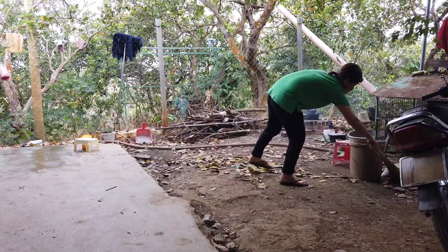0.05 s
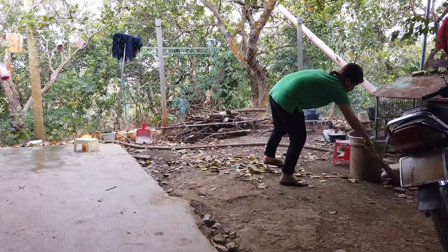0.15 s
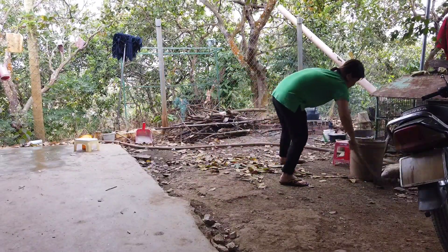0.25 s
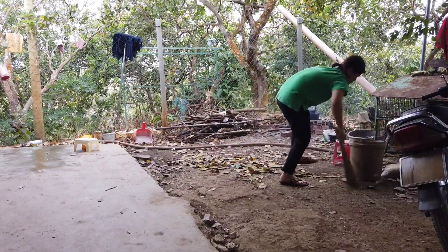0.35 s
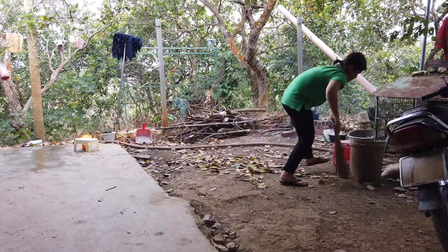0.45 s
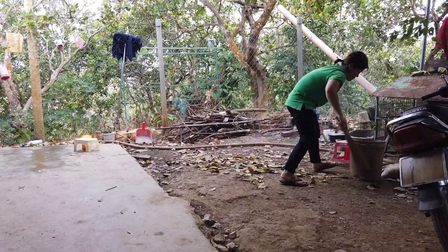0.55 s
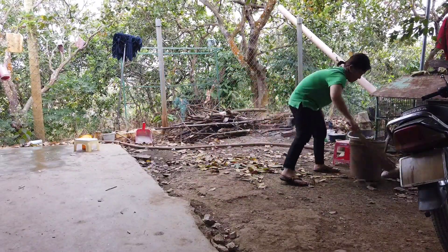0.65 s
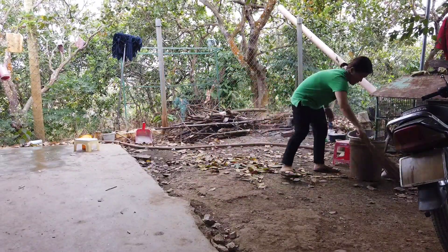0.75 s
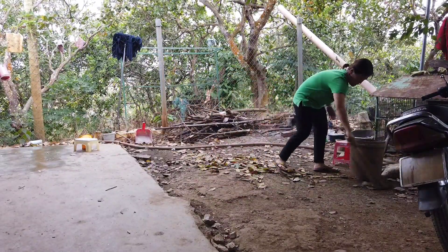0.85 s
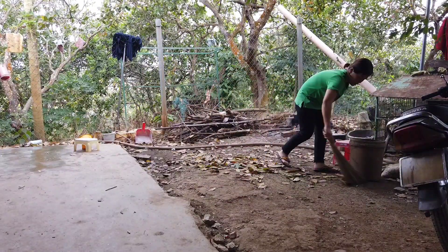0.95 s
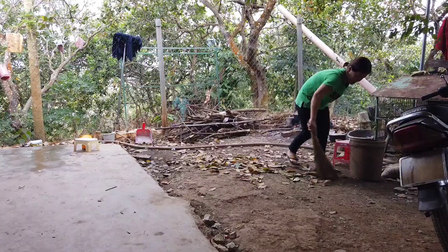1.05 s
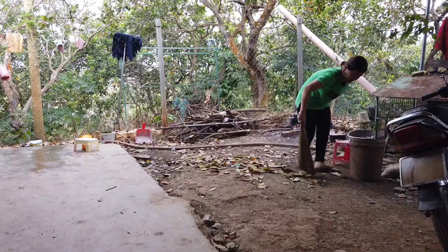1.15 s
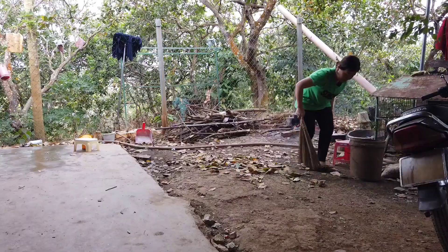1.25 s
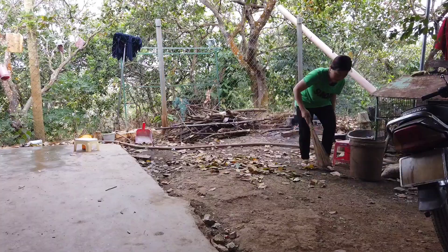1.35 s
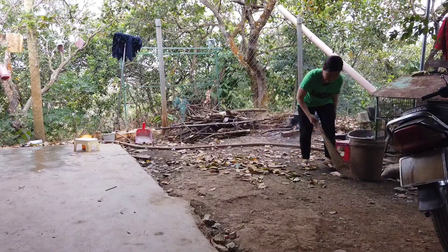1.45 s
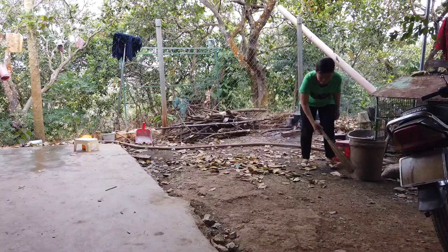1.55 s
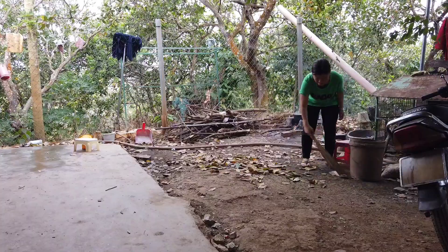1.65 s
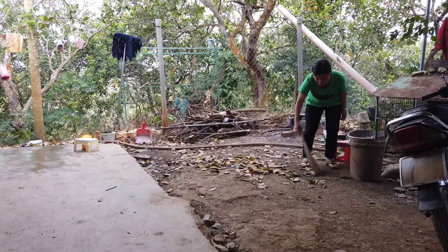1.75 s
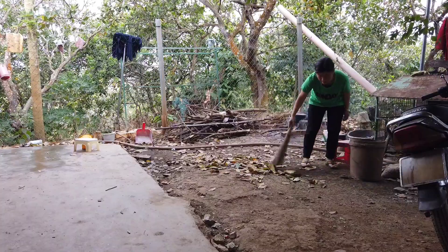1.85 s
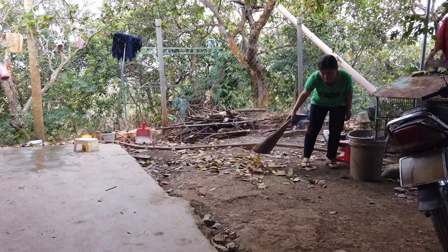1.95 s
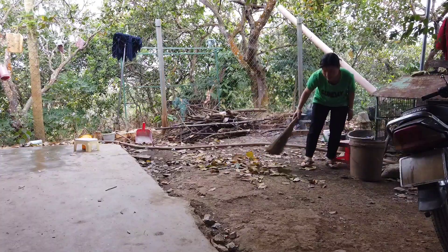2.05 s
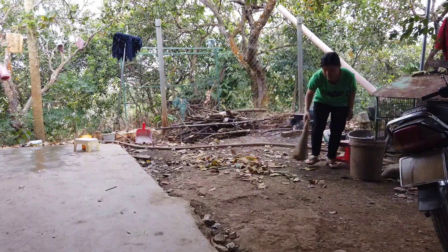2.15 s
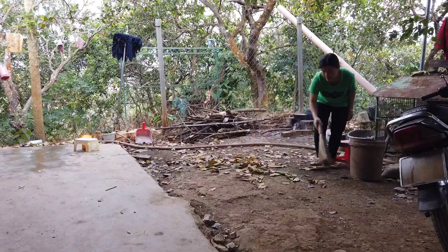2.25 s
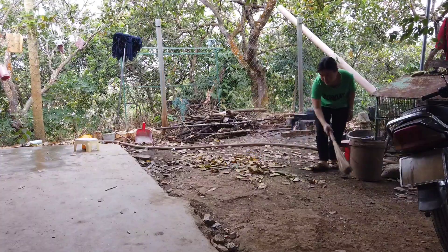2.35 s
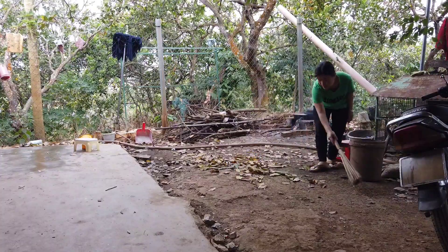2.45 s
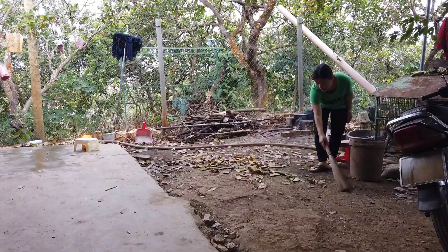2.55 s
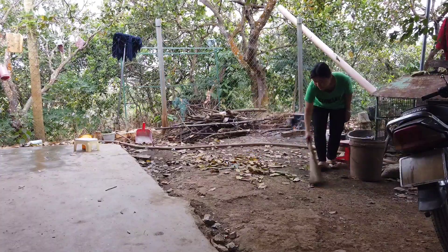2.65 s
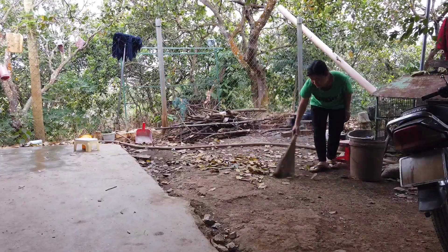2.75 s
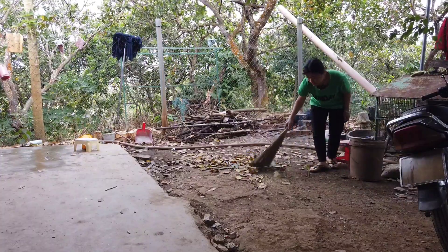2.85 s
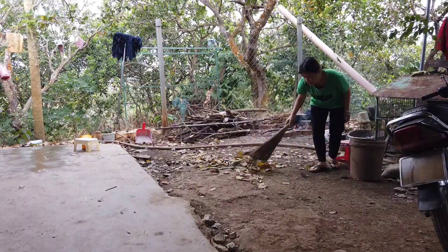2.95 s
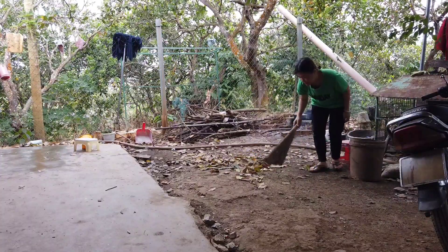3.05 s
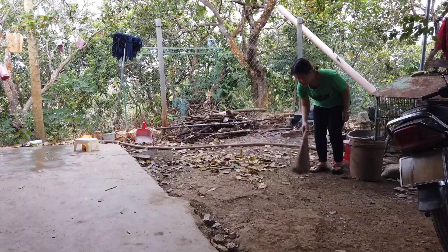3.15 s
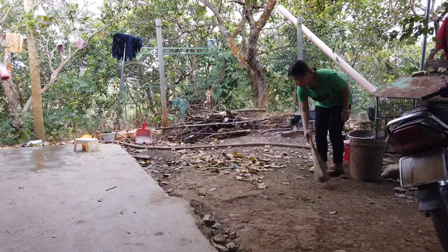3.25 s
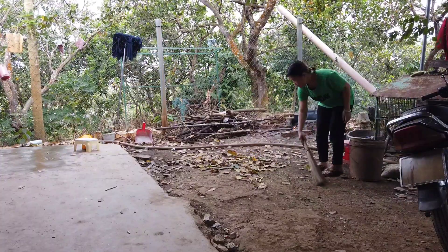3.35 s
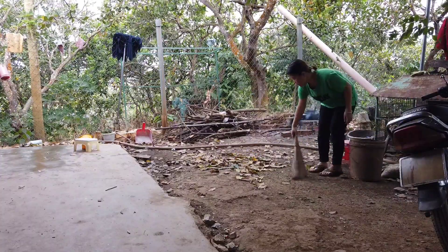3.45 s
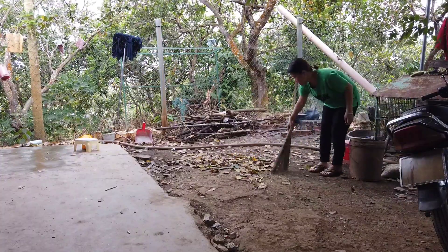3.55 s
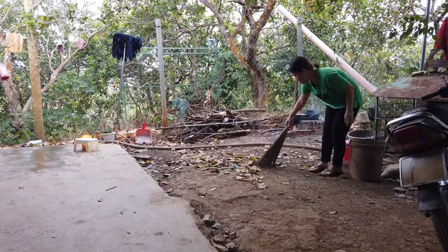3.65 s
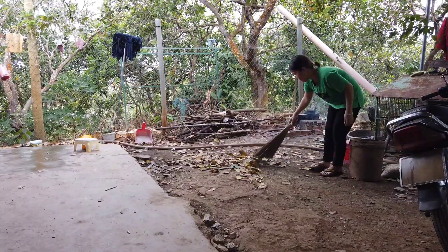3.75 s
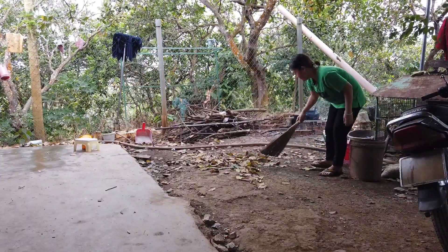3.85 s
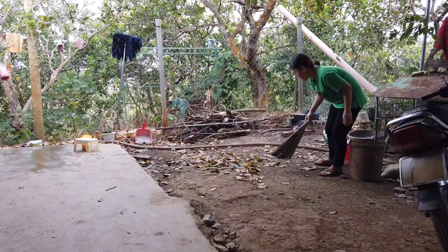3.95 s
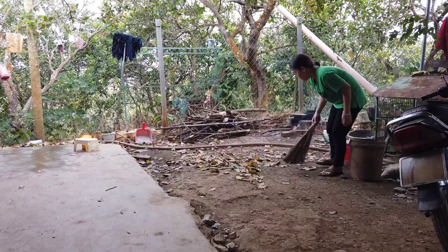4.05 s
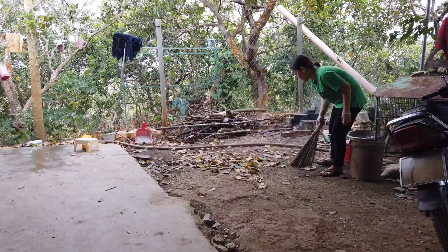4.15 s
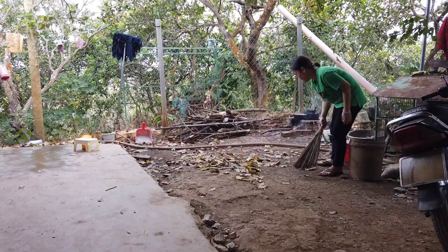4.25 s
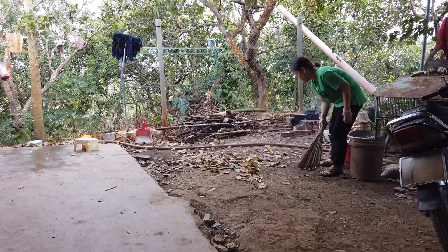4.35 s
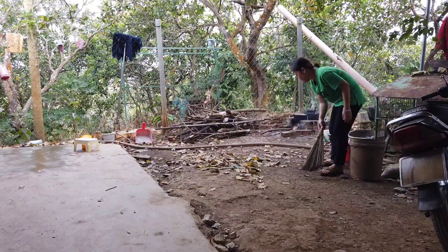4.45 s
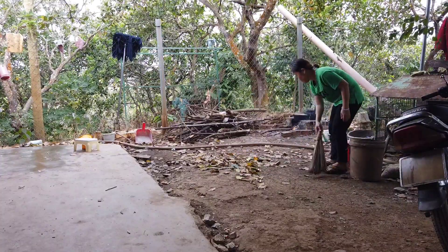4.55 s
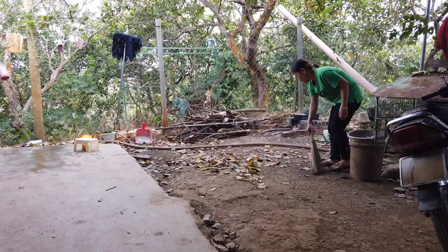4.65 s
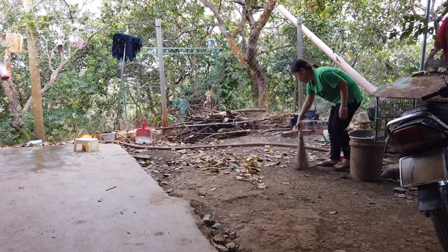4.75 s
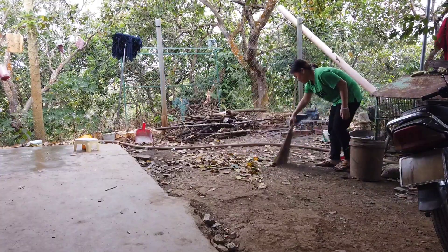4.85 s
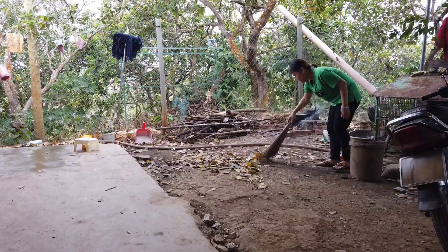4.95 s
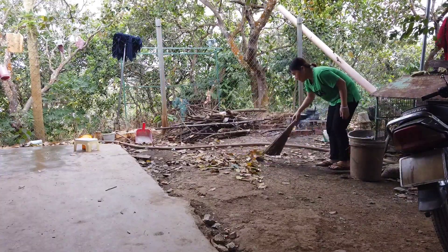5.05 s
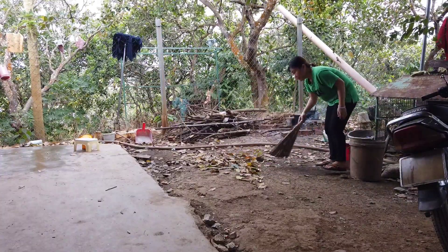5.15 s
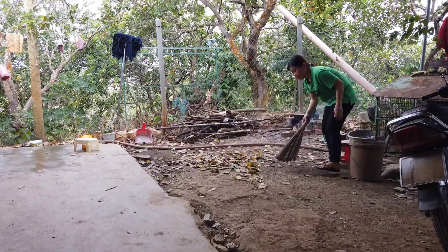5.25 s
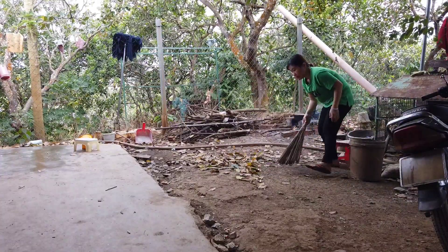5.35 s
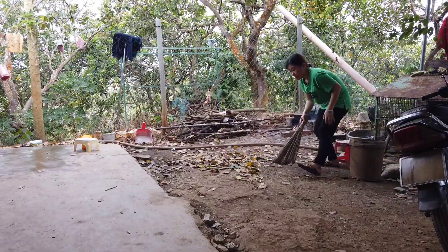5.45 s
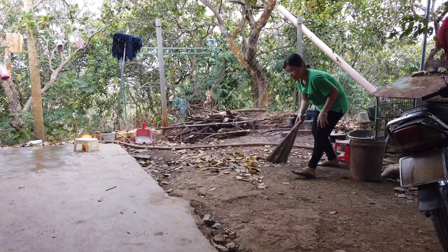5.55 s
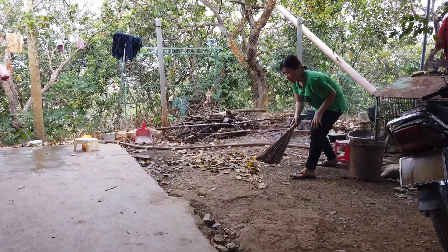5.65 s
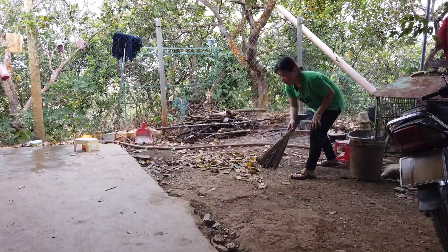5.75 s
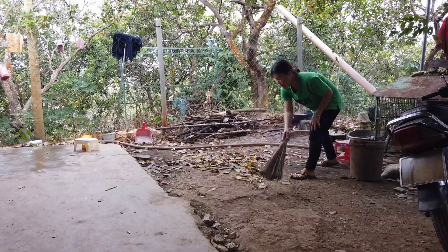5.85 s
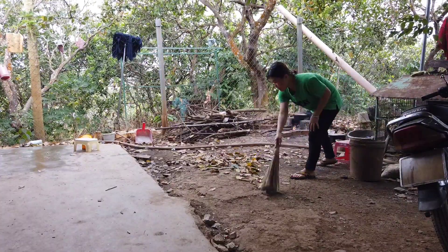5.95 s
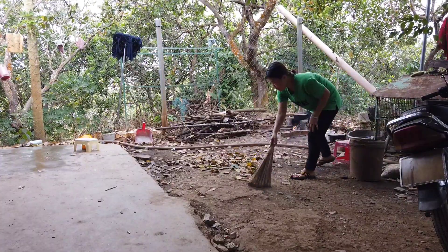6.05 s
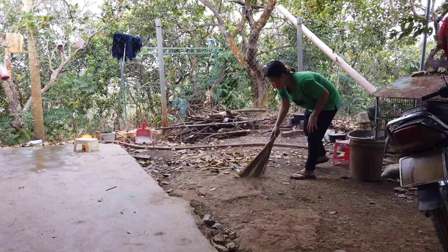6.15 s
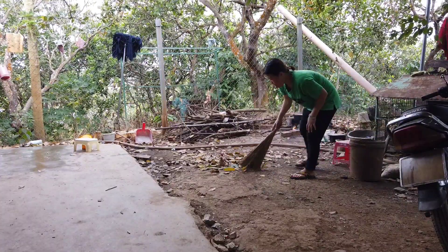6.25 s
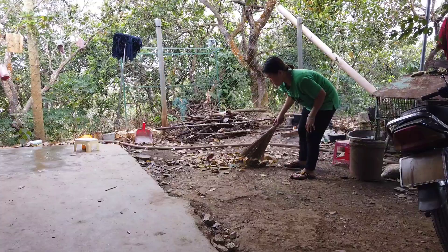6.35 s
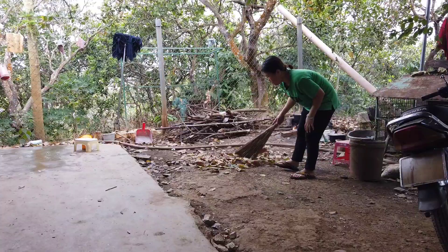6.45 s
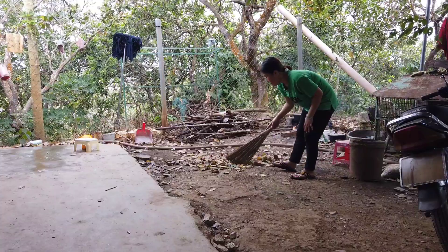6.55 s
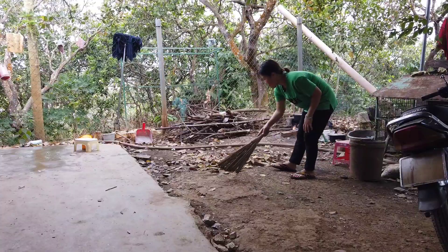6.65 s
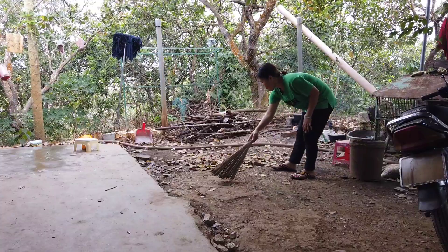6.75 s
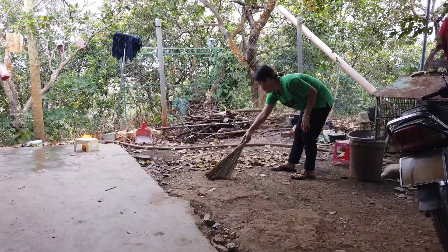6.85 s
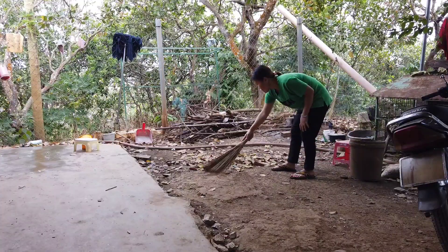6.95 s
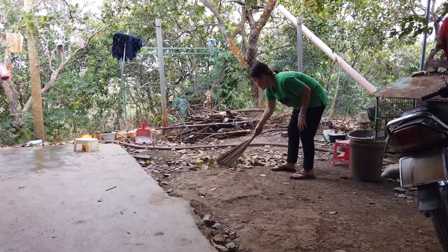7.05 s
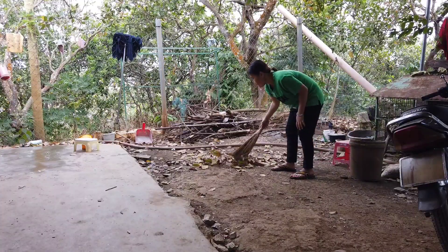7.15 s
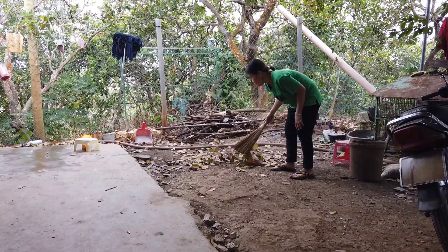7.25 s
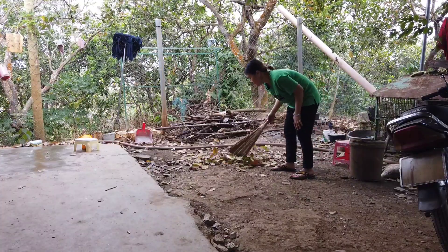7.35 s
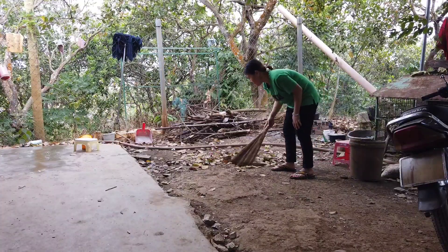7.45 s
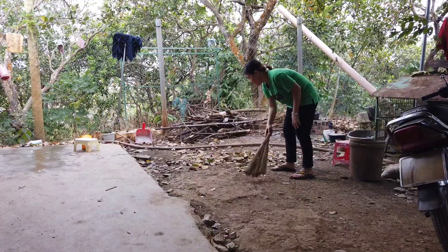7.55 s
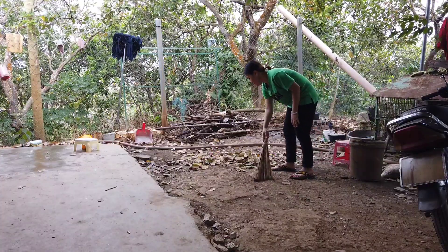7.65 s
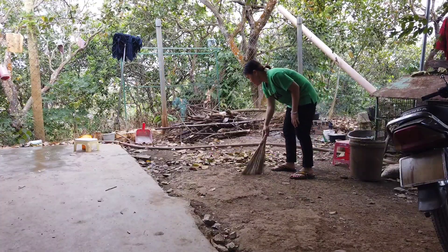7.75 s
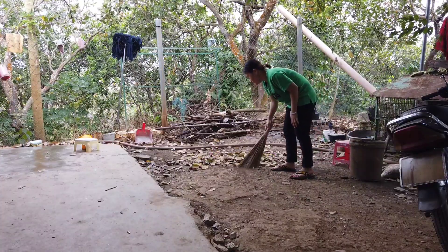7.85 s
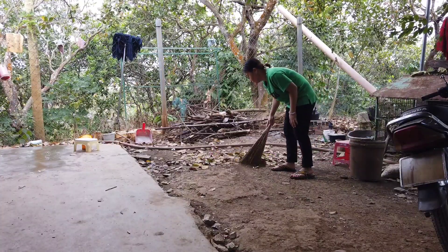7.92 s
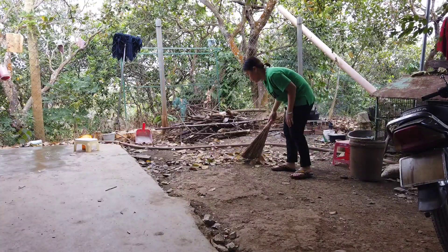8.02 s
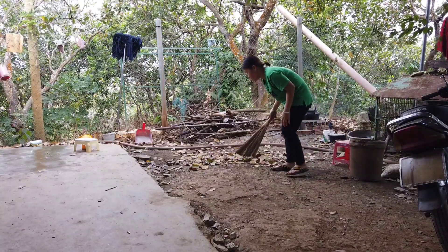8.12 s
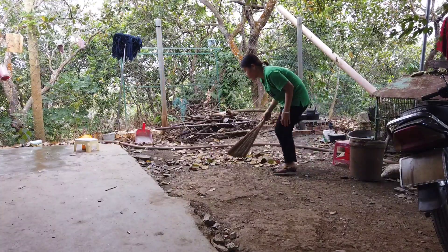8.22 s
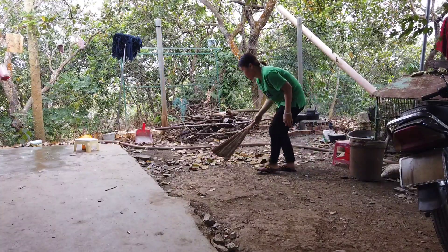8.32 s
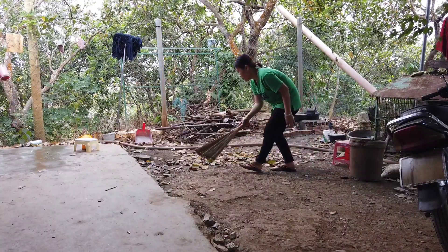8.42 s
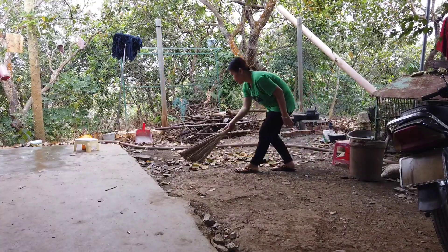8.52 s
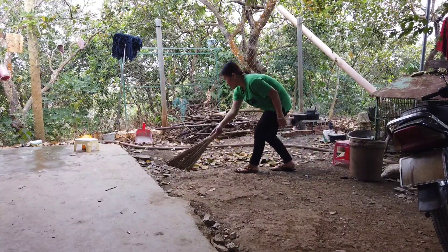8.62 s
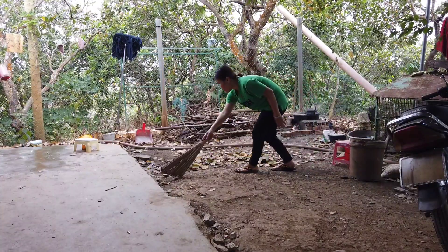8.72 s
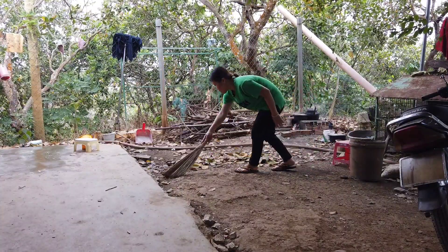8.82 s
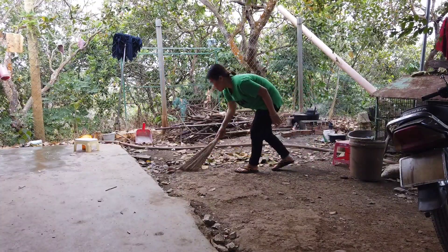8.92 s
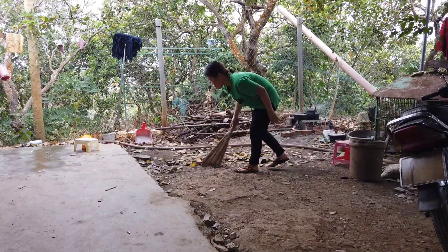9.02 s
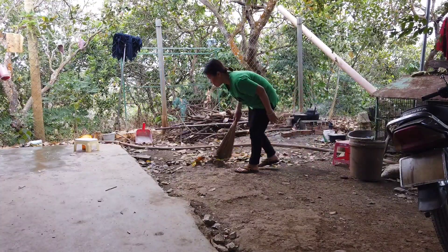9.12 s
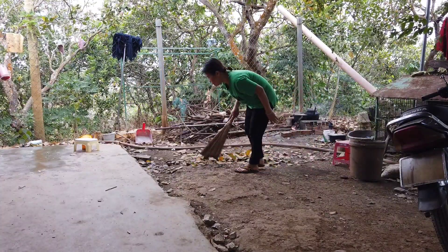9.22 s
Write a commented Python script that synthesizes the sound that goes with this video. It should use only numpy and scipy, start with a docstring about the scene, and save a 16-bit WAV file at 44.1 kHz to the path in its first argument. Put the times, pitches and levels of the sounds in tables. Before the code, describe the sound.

A stiff grass broom sweeps dry leaves and grit over bare dirt, heard in stereo from a few steps away in a quiet yard. Strokes start near 0.1, 0.9, 1.6, 2.6, 3.4, 4.7, 6.1, 6.9, 7.7 and 8.8 seconds. Each lasts about 0.7 seconds: bright bristle hiss, a fast swell with brittle leaf rattle and low gritty drag, then a thin trailing swish. Near-quiet gaps hold foot shuffles and toppling leaves. Twigs snap around 0.6, 0.8, 2.0 to 2.3, 3.1, 3.6 and 6.2, most sharply just after 9. Faint narrow scrapes appear, especially at 5.8 to 7.5. Dull soft thuds land near 1.6, 5.0, 8.4 and 8.9. Uneven light wind rumble and a wavering distant low hum stay underneath. A very brief high pip swells and stops abruptly close to the end.

```python
"""A stiff grass broom sweeps dry leaves and grit over bare dirt, a few steps from two microphone ports.
Dense ticks and noise make the bristles hiss; leaves rattle as knocked resonances; soil drags in low scrapes.
Twig snaps, narrow scrapes, dull thuds and one brief swelling pip punctuate the strokes.
Lumpy low noise is light wind at the ports; shaped noise is a quiet yard; a wavering low hum swells far away."""
import sys
import numpy as np
from scipy import signal
from scipy.fft import rfft, irfft
from scipy.io import wavfile
from scipy.ndimage import uniform_filter1d

SR = 44100
rng = np.random.default_rng(int(sys.argv[2]) if len(sys.argv) > 2 else 0)


def unload_audio(sound):
    """Save the sound as a 16-bit wav file, at the path given as the first command line argument."""
    columns = np.transpose(np.atleast_2d(sound))
    # keep every value between -1 and 1, then stretch to whole-number steps
    steps = np.round(np.clip(columns, -1, 1) * 32767)
    wavfile.write(sys.argv[1], SR, steps.astype(np.int16))


N = 409248

# Broom strokes: the tips land, skim, are pushed hard, ease off, trail along and lift.
# (touch [s], skim [s], rise [s], hold [s], ease [s], lift after touch [s], dying [dB/s], skim level [dB],
#  level at end of push [dB], trail level [dB], last level [dB], skimming sizzle [dB], pushed sizzle [dB])
STROKES = [(0.143, .17, 0.074, 0.082, 0.11, 0.64, 90, -54.5, -39, -60.5, -73, 1.5, 0),
           (0.943, .036, .15, 0.032, 0.19, .63, 150, -43.5, -39, -56, -58.5, -1.5, 0.5),
           (1.636, .185, 0.14, .02, .08, 0.71, 77, -48, -38.5, -45.5, -53.5, 1.2, -2),
           (2.612, 0.055, .15, 0.11, 0.088, 0.72, 114, -52, -34, -44, -54, 3, -3),
           (3.443, .12, .07, 0.17, 0.11, 0.65, 120, -47, -39.5, -51, -60, 2.5, -1.5),
           (4.718, .13, .10, 0.073, 0.11, 0.73, 69, -49, -40.5, -50.5, -66.5, 3.5, -0.3),
           (6.08, .036, 0.17, .08, 0.2, 0.66, 105, -45, -34, -49, -50.5, 5, -4.5),
           (6.865, .09, .19, .08, .16, .76, 120, -58, -36, -50, -59.5, 4, -1.5),
           (7.748, 0.056, 0.17, .03, 0.22, 0.68, 135, -50.5, -39.5, -52.5, -58, 4.5, -2),
           (8.826, 0.062, .17, 0.064, .15, .60, 100, -53.5, -36.5, -53.5, -60, .2, 1)]
# The heap each stroke moves, in the same order; leaf and soil levels are reached at the end of the hold.
# (caught after touch [s], rise [s], hold [s], ease [s], leaf level [dB], leaf trail level [dB],
#  leaf last level [dB], soil lag [s], soil level [dB], soil trail level [dB])
HEAPS = [(0.12, 0.071, 0.096, .11, -40, -53.5, -67.5, -0.048, -52, -67),
         (0.0075, 0.13, 0.052, 0.053, -45, -50, -61.5, -0.054, -59.5, -65),
         (0.16, 0.14, 0.1, 0.068, -45, -49, -53.5, .01, -53.5, -58.5),
         (.13, 0.036, 0.16, 0.083, -38, -48.5, -54.5, .01, -47.5, -59),
         (0.15, 0.055, .20, .07, -45.5, -50, -52, .02, -57.5, -61),
         (.12, .14, .02, .12, -40, -52, -65, .07, -48.5, -58.5),
         (0.072, 0.051, 0.2, .10, -37, -48, -51.5, -0.015, -46, -56.5),
         (.17, .12, .07, .14, -37, -49.5, -59, .03, -45, -58.5),
         (.16, 0.065, .10, 0.12, -43, -50, -61, -.01, -51.5, -59),
         (.21, .06, 0.081, .07, -40, -54, -62, -.005, -47.5, -64.5)]
# Feet shift and leaves topple: (middle [s], length [s], leaf level [dB], soil level [dB], bristle level [dB])
SHUFFLES = [(0.01, 0.29, -65, -85, -68.5), (0.235, 0.18, -53.5, -61, -80), (0.352, 0.061, -37.5, -55, -80),
            (0.65, .06, -75, -72, -61), (0.722, .14, -73, -62, -80), (0.838, .05, -61, -63, -90),
            (0.898, 0.076, -63.5, -69, -90), (1.399, 0.068, -55, -63, -80), (1.715, .15, -53.5, -57, -80),
            (1.765, 0.065, -61, -65, -44.5), (2.303, 0.12, -50, -68, -70), (3.23, 0.18, -67, -64, -70),
            (3.102, .06, -60, -65, -54), (3.69, .05, -46, -60, -60), (3.82, .07, -48, -52, -60),
            (5.753, 0.33, -74.5, -69.5, -90), (6.1, 0.18, -75, -64.5, -90), (6.686, 0.14, -51, -70, -70),
            (8.32, 0.17, -62, -61, -80), (8.491, 0.17, -75, -57.5, -80), (8.71, .1, -78, -65, -90),
            (8.91, 0.087, -69, -60, -70), (9.02, .14, -53, -63, -70), (9.025, .045, -43, -52, -70)]
# Bristle tips touch down: (time [s], approximate peak level [dB], t60 [s])
TOUCHES = [(0.1424, -62, 0.15), (0.6973, -57, 0.13), (0.9623, -44, 0.15), (1.644, -42, 0.15),
           (3.0994, -36.5, 0.16), (4.5047, -60, 0.15), (4.6573, -51, 0.16), (6.101, -42, 0.15),
           (8.8555, -39, 0.15)]
# Narrow hollow-toned scrapes: (time [s], length [s], level before the fade [dB], pitch [Hz], width [Hz])
SCRAPES = [(0.138, .12, -62.5, 2300, 350), (0.166, .05, -62, 3400, 300), (0.168, 0.16, -62, 765, 120),
           (0.638, .04, -64, 1900, 120), (0.841, 0.027, -61, 1400, 150), (0.958, .04, -56, 3130, 400),
           (5.76, 0.22, -66, 707, 110), (6.031, 0.069, -68, 745, 110), (6.717, 0.075, -63, 810, 100),
           (6.803, 0.076, -60.5, 1770, 150), (6.875, 0.13, -63.5, 1760, 170), (6.8, 0.13, -69, 2450, 150),
           (7.021, .07, -70, 820, 100), (7.491, 0.18, -62, 1770, 170)]
# Single twig and leaf snaps: (time [s], peak level [dB], pitch [Hz], t60 [s], ring relative to tick [dB])
SNAPS = [(0.143, -49.5, 2170, 0.05, -6), (0.569, -42, 2410, 0.05, -10), (0.606, -41, 2670, 0.05, -9.5),
         (0.696, -53, 1870, 0.05, -8), (0.711, -49, 1960, 0.05, -7), (0.824, -37, 1600, 0.046, -12),
         (1.447, -46, 1980, 0.05, -8), (1.53, -51, 1790, 0.05, -8), (2.008, -31, 2580, 0.05, -6.5),
         (2.132, -36, 2320, 0.05, -6.5), (2.267, -37.5, 1870, 0.05, -6), (3.099, -34, 2520, 0.039, -10),
         (3.609, -32, 2600, 0.05, -5), (5.705, -54, 2570, 0.055, -8), (6.205, -32, 1910, 0.05, -9),
         (8.373, -37, 5200, 0.03, -19), (9.024, -24, 2750, 0.05, -10.5), (9.087, -30, 2220, 0.042, -8.5)]
# A foot or the broom head lands:
# (time [s], t60 [s], broad scuff level [dB], hollow mode level [dB], low mode level [dB])
THUDS = [(1.644, 0.4, -56, -61, -47.5), (4.968, 0.33, -58, -43.5, -65), (5.01, 1, -68, -73, -53.5),
         (8.427, 0.84, -58, -63, -52), (8.904, 0.69, -66, -58.5, -54.5)]
# Bristle spectrum: (frequency [Hz], relative level [dB])
TIPS_SPECTRUM = [(400, -22), (1500, -25), (2500, -4.5), (4500, -5), (6500, -1), (8900, -2.5), (10500, 1.5),
                 (13000, -4), (15500, -7)]
# How far the sizzle acts on the hiss: (frequency [Hz], share [0-1])
SIZZLE_SHARE = [(6000, 0), (10500, 0.88)]
# Leaf spectrum: (frequency [Hz], relative level [dB])
LEAF_SPECTRUM = [(400, -25), (900, -6.5), (1300, -3.5), (1700, 3.5), (2600, 3), (3300, 0), (4200, -5.5),
                 (6500, -9), (10000, -10), (15500, -16)]
# Soil spectrum: (frequency [Hz], relative level [dB])
SOIL_SPECTRUM = [(90, -8), (200, -9.5), (330, 3.5), (430, -2), (600, 2), (760, 6.5), (920, 3), (1200, -0.5),
                 (1600, 3.5), (4000, -49)]
# Low rumble at the ports, its uneven level through random lumps: (time [s], mid level [dB])
RUMBLE_LEVEL = [(0.0, -65), (0.59, -68), (0.67, -53), (0.82, -66), (0.95, -47.5), (1.32, -58), (1.76, -51),
                (1.81, -64), (2.19, -63), (2.3, -49), (2.35, -64.5), (3.1, -64), (3.18, -72), (3.2, -56),
                (3.9, -69.5), (4.65, -56), (4.88, -66), (4.91, -51), (5.06, -68), (5.19, -44), (5.25, -62),
                (5.48, -58.5), (8.32, -64), (8.4, -50), (8.66, -49.5), (8.71, -61.5), (9.2, -42.5),
                (9.28, -67)]
# Wind spectrum: (frequency [Hz], relative level [dB])
GUST_SPECTRUM = [(10, -32), (25, 0), (45, -10.5), (80, -21.5), (150, -33), (300, -49), (1000, -88)]
# Yard spectrum: (frequency [Hz], relative level [dB])
YARD_SPECTRUM = [(47, -40), (80, -2), (307, -13), (343, -17), (446, -15.5), (607, -20), (1010, -43),
                 (7830, -37), (10200, -43), (13000, -55), (15500, -36)]
# Far hum: (time [s], level [dB])
HUM_LEVEL = [(0.0, -70), (0.82, -70.5), (0.95, -54), (1.37, -72), (1.42, -64), (3.15, -71), (3.18, -59.5),
             (3.67, -69.5), (6.15, -64), (6.46, -71.5), (8.63, -55), (8.68, -68), (9.18, -54.5),
             (9.28, -63)]
# Loose stereo spread: (frequency [Hz], side relative to mid [dB])
WIDTH = [(60, -6), (110, -40), (200, -48), (380, -21), (700, -12.5), (1290, -9), (2380, -4), (4400, -4),
         (8120, -4), (15000, -2)]
# Lead of the left port, before it is narrowed in sideways(): (frequency [Hz], phase [rad])
LEAD = [(0, 0), (1290, 0.18), (1810, 0), (3010, 1), (3450, 0.39), (5080, 0.0), (7150, 0.4), (7580, 0.3),
        (15700, 0.1)]

# Stroke shape: share of the rise and of the ease (in dB) done at half time; loss over the bristles' hold
EARLY, LATE, DROOP_DB = 0.58, 0.42, 1.5
# Landing time; depth below target where a sound starts; heap's dying rate against the bristles'
LAND_S, HUSH_DB, SETTLE = 0.047, 24, 0.82
LEAF_SWELL_DB, SOIL_SWELL_DB = 1.4, 5.5  # the heap grows, so it swells over the hold
SIZZLE_KEEP, TRAIL_DULL_DB = .15, 1.5  # share of the rise that keeps its sizzle; the finest tips lose contact first
# Three layers (bristles, leaves, soil): faint stir between strokes; stir by skimming tips against the skim level
IDLE_DB, NUDGE_DB = (-84, -72, -73.5), (0, -18, -24)
HEEL, SOLE, HOLLOW = (200, 120), (500, 600), (735, 90)  # what a thud rings: (pitch [Hz], width [Hz])
HUM_HZ, YARD_DB = 66.2, -66.5
UNLIKE = .8  # wind's side against its mid
EDGE_HZ = 15520  # upper band limit


def bristles():
    """Thousands of tips slip over the grit: a dense, bright hiss."""
    hiss = evened(ticks(9000, spread_db=1.0)) + 1.08 * rng.standard_normal(N)
    hiss = patchy(hiss, patchy_db=1.5, frames=6, bins=10)
    hiss = evened(coloured(hiss, TIPS_SPECTRUM))
    share = read(SIZZLE_SHARE, np.fft.rfftfreq(N, 1 / SR))
    finest = irfft(rfft(hiss) * share, N)
    return effort(0) * (hiss + (sizzle() - 1) * finest)


def sizzle():
    """The hiss changes brightness from skim to push: most strokes darken, the second and last brighten."""
    corners = []
    for touch, skim, rise, hold, ease, lift, *_, skim_db, push_db in STROKES:
        pushing = touch + skim
        corners += [(touch, skim_db),
                    (pushing + SIZZLE_KEEP * rise, skim_db),
                    (pushing + rise, push_db),
                    (touch + lift, push_db - TRAIL_DULL_DB)]
    return level(corners)


def touches():
    """The hiss starts abruptly when the tips meet the ground: decaying noise in the bristles' colour."""
    out, t = np.zeros(N), np.arange(SR // 4) / SR
    puffs = rng.standard_normal((len(TOUCHES), len(t)))
    for (s, db, t60), puff in zip(TOUCHES, puffs):
        add(out, s, .3 * gain_of(db - 60 * t / abs(t60)) * puff)  # .3 brings the noise peaks near the set level
    tips = coloured(out, TIPS_SPECTRUM)
    return tips * np.std(out) / np.std(tips)


def leaves():
    """Each stiff leaf rings at its own pitch whenever it is knocked: half ring briefly, half longer."""
    t, rattle = np.arange(1500) / SR, np.zeros(N)
    knocks = ticks(2600, spread_db=1.5)
    which = rng.integers(0, 36, N)
    for k, hz in enumerate(np.geomspace(700, 12000, 36)):
        cycles = (3.5, 14)[k % 2]  # decay constant in cycles
        ring = np.sin(2 * np.pi * hz * t) * np.exp(-t * hz / cycles)
        ring *= 1 - np.exp(-t / 0.00017)  # soft onset
        ring *= np.sqrt(hz) / np.linalg.norm(ring)
        rattle += signal.oaconvolve(knocks * (which == k), ring)[:N]
    rustle = evened(rattle) + rng.standard_normal(N)  # rings over a bed of fine rustle
    rustle = patchy(rustle, patchy_db=1.5, frames=5, bins=3)
    return effort(1) * evened(coloured(rustle, LEAF_SPECTRUM))


def drag():
    """Soles and heaped leaves scrape the crumbly soil: sparse ticks over noise, coloured low."""
    scrape = evened(ticks(700, spread_db=1.5)) + 0.89 * rng.standard_normal(N)
    scrape = patchy(scrape, patchy_db=1.0, frames=8, bins=2)
    return effort(2) * evened(coloured(scrape, SOIL_SPECTRUM))


def effort(layer):
    """Level over time of bristles (0), leaves (1) or soil (2): strokes, shuffles and idle stir add in power."""
    t = np.arange(0, N + 64, 64) / SR
    power = gain_of(IDLE_DB[layer]) ** 2 + 0 * t
    for stroke, heap in zip(STROKES, HEAPS):
        corners = stroke_corners(layer, stroke, heap)
        power += gain_of(np.interp(t, *corners.T, left=-150, right=-150)) ** 2
        if layer:  # skimming tips already stir leaves and soil
            touch, skim_db, caught, rise = stroke[0], stroke[7], heap[0], heap[1]
            nudge_s = touch + np.r_[0, LAND_S, LAND_S + caught + rise]
            power += gain_of(skim_db + NUDGE_DB[layer]) ** 2 * np.interp(t, nudge_s, [0, 1, 1], right=0)
    for s, length, leaf_db, soil_db, tips_db in SHUFFLES:
        bump = np.cos(np.pi * np.clip((t - s) / length, -.5, .5)) ** 2
        power += gain_of((tips_db, leaf_db, soil_db)[layer]) ** 2 * bump
    return np.interp(np.arange(N) / SR, t, np.sqrt(power))


def stroke_corners(layer, stroke, heap):
    """One stroke: bristles, leaves and soil each start at their own time; soil may lead or lag the leaves."""
    touch, skim, rise, hold, ease, lift, dying, skim_db, push_db, trail_db, last_db, *_ = stroke
    caught, up, stay, down, leaf_db, leaf_trail_db, leaf_last_db, lag, soil_db, soil_trail_db = heap
    end, settling = touch + lift, SETTLE * dying
    if layer == 0:
        landing = [(touch, skim_db - HUSH_DB), (touch + min(LAND_S, skim), skim_db)]
        return np.r_[landing, push(touch + skim, rise, hold, ease, end, dying,
                                   skim_db, push_db, trail_db, last_db, -DROOP_DB)]
    if layer == 1:
        return push(touch + caught, up, stay, down, end, settling,
                    leaf_db - HUSH_DB, leaf_db, leaf_trail_db, leaf_last_db, LEAF_SWELL_DB)
    soil_last_db = soil_trail_db + leaf_last_db - leaf_trail_db  # falls as far as the leaves do
    return push(touch + caught + lag, up - lag, stay, down, end, settling,
                soil_db - HUSH_DB, soil_db, soil_trail_db, soil_last_db, SOIL_SWELL_DB)


def push(start, rise, hold, ease, end, dying, from_db, top_db, trail_db, last_db, swell_db):
    """Corners (time [s], level [dB]) of one effort: rise, hold, ease off, trail until the end, die away."""
    s = start + np.cumsum(np.abs([0, rise / 2, rise / 2, hold, ease / 2, ease / 2]))
    end = max(end, s[-1])
    reached_db = top_db - swell_db  # level as the hold begins
    half_up_db = from_db + EARLY * (reached_db - from_db)
    half_down_db = top_db + LATE * (trail_db - top_db)
    levels = [from_db, half_up_db, reached_db, top_db, half_down_db, trail_db, last_db, last_db - dying]
    return np.c_[[*s, end, end + 1], levels]


def scrapes():
    """Rubbing noise held in one narrow resonance, quick to start and fading out."""
    out = np.zeros(N)
    rubs = rng.standard_normal((len(SCRAPES), SR // 2))
    for (s, length, db, hz, width), rub in zip(SCRAPES, rubs):
        u = np.arange(round(length * SR)) / (length * SR)
        tone = ringing(ringing(rub, hz, width), hz, width)[-len(u):]
        add(out, s, gain_of(db) * evened(tone) * np.minimum(20 * u, 1) * np.sqrt(1 - u ** 2))
    return out


def snaps():
    """A dull tick of 1.6 cycles with a short rough ring of resonant noise."""
    out, t = np.zeros(N), np.arange(4000) / SR
    noises = rng.standard_normal((len(SNAPS), len(t)))
    for (s, db, hz, t60, ring_db), noise in zip(SNAPS, noises):
        tick = np.sin(2 * np.pi * hz * t) * np.sin(np.pi * np.minimum(t * hz / 1.6, 1)) ** 2
        ring = ringing(noise, hz, width=410) * gain_of(ring_db - 60 * t / abs(t60))
        add(out, s, gain_of(db) * (tick + ring))
    return out


def pip():
    """A pure 3053 Hz tone swells from -60 dB at 300 dB/s for 0.09 s and stops dead."""
    out, t = np.zeros(N), np.arange(4000) / SR
    add(out, -3, gain_of(-60 + 300 * t) * np.sin(2 * np.pi * 3053 * t))  # starts 3 s before the end
    return out


def thuds():
    """A dull scuff of noise: broad, with a hollow mode and a heavy low one."""
    out, t = np.zeros(N), np.arange(SR // 2) / SR
    puffs = rng.standard_normal((len(THUDS), len(t)))
    for (s, t60, *parts_db), puff in zip(THUDS, puffs):
        body = sum(gain_of(db) * ringing(puff, *mode) for db, mode in zip(parts_db, (SOLE, HOLLOW, HEEL)))
        add(out, s, gain_of(-60 * t / abs(t60)) * body)
    return out


def scattered(x, t60):
    """Pots, trees and walls throw the sound back; three sets of decaying taps take turns 2.3 times a second."""
    t, out = np.arange(SR // 4) / SR, np.zeros(N)
    taps = rng.standard_normal((3, len(t))) * gain_of(-60 * t / t60) * (t > .004)
    for k, tail in enumerate(taps):
        turn = np.sqrt(2 / 3) * np.cos(2 * np.pi * (2.3 * np.arange(N) / SR + k / 3))
        out += signal.oaconvolve(x * turn, tail / np.linalg.norm(tail))[:N]
    return out


def sideways(x):
    """Grains come from scattered spots, so short waves reach the two ports at loosely related phases."""
    hz, _, z = signal.stft(x, SR, nperseg=256)
    random_phase = np.exp(2j * np.pi * rng.random(z.shape))
    loose = signal.istft(z * random_phase, nperseg=256)[1][:N]
    lead = .7j * np.tan(read(LEAD, hz) / 2)[:, None]  # .7 narrows the lead
    ahead = signal.istft(z * lead, nperseg=256)[1][:N]
    return coloured(loose * np.std(x) / np.std(loose), WIDTH) + ahead


def wind():
    """Lumpy low pressure noise, largely unrelated at the two ports."""
    a, b, lumps = rng.standard_normal((3, N))
    lumps = gain_of(3.0 * evened(uniform_filter1d(lumps, size=4000)))
    mid, side = (evened(coloured(x, GUST_SPECTRUM) * lumps) for x in (a, b))
    return level(RUMBLE_LEVEL) * np.array([mid + UNLIKE * side, mid - UNLIKE * side])


def yard():
    """The steady far murmur of leaves and air: noise with a fixed spectrum."""
    return gain_of(YARD_DB) * evened(coloured(rng.standard_normal(N), YARD_SPECTRUM))


def hum():
    """A narrow, wavering low tone: slow noise modulates its two quadratures."""
    waver = rng.standard_normal((2, N))
    for _ in range(2):
        waver = uniform_filter1d(waver, size=1300, axis=1)
    turn = 2 * np.pi * HUM_HZ * np.arange(N) / SR
    return level(HUM_LEVEL) * evened(waver[0] * np.cos(turn) + waver[1] * np.sin(turn))


def ticks(per_s, spread_db):
    """Random clicks; most are small, a few large."""
    chance, size, sign = rng.random((3, N))
    sizes = gain_of(spread_db * np.minimum(-np.log(size + 1e-9), 5))
    return (chance < per_s / SR) * sizes * np.sign(sign - .5)


def patchy(x, patchy_db, frames, bins):
    """Random patches of time and pitch come forward and fall back."""
    z = signal.stft(x, nperseg=512)[2]
    field = rng.standard_normal(z.shape)
    field = uniform_filter1d(uniform_filter1d(field, bins, 0), frames, 1)
    return signal.istft(z * gain_of(patchy_db * evened(field)), nperseg=512)[1][:N]


def ringing(x, hz, width):
    """Noise through one resonance, at unit RMS."""
    r = np.exp(-np.pi * width / SR)
    return evened(signal.lfilter([1, 0, -1], [1, -2 * r * np.cos(2 * np.pi * hz / SR), r * r], x))


def coloured(x, points):
    """Shapes a sound by a spectrum in dB."""
    return irfft(rfft(x) * gain_of(read(points, np.fft.rfftfreq(N, 1 / SR))), N)


def read(points, hz):
    """Reads a table over log frequency."""
    f, value = np.transpose(points)
    return np.interp(np.log(hz + 1), np.log(f + 1), value)


def level(rows):
    """Gain over time through rows of (time [s], level [dB])."""
    s, db = np.transpose(rows)
    return gain_of(np.interp(np.arange(N) / SR, s, db))


def gain_of(db):
    """Amplitude factor of a level in dB."""
    return 10 ** (np.asarray(db) / 20)


def evened(x):
    """Scales to unit RMS."""
    return x / np.sqrt(np.mean(x ** 2) + 1e-20)


def add(mix, s, sound):
    """Lays a sound into the mix at s seconds; negative s counts from the end."""
    part = mix[round(s * SR):][:len(sound)]
    part += sound[:len(part)]


def scene():
    """Broom, heap and feet with their echoes, over yard and hum; wind is added at the two ports."""
    near = bristles() + touches() + leaves() + drag() + scrapes() + snaps() + pip() + thuds()
    mid = near + gain_of(-12) * scattered(near, t60=0.1) + yard() + hum()
    side = sideways(mid)
    return np.array([mid + side, mid - side]) + wind()


def record(dry):
    """Limits the band with a steep low-pass."""
    lowpass = signal.firwin(1023, EDGE_HZ, window=("kaiser", 9), fs=SR)
    return signal.oaconvolve(dry, lowpass[None], "same")


dry = scene()
out = record(dry)
unload_audio(out)
```